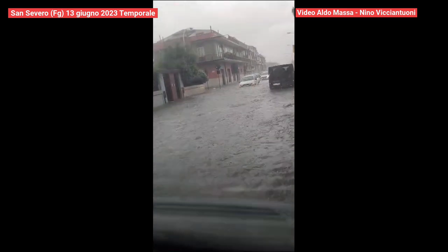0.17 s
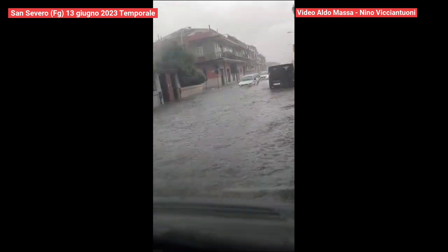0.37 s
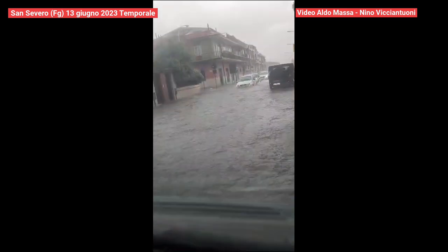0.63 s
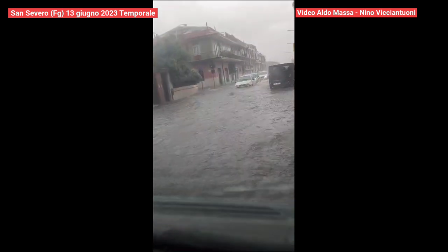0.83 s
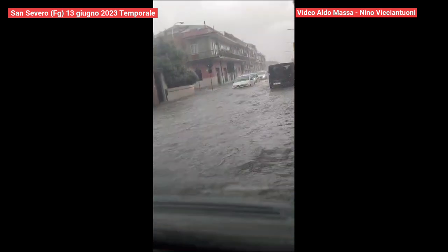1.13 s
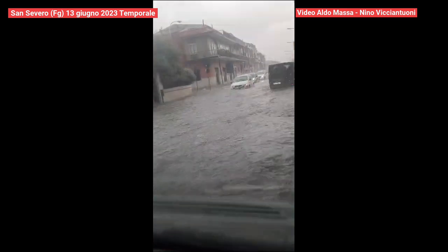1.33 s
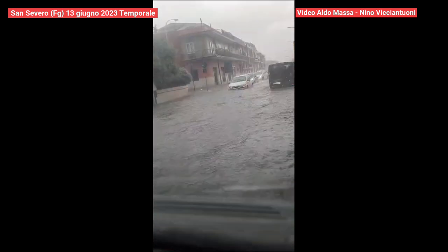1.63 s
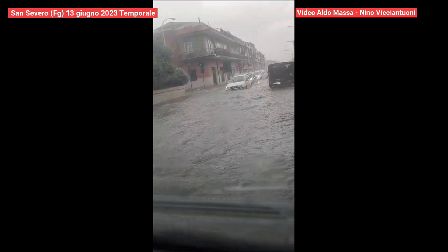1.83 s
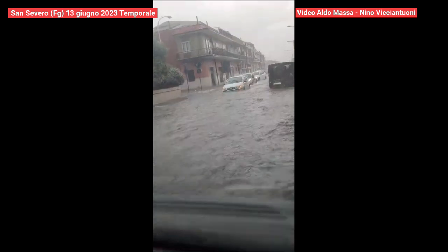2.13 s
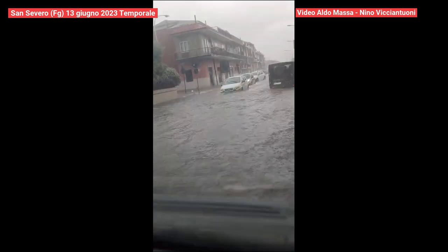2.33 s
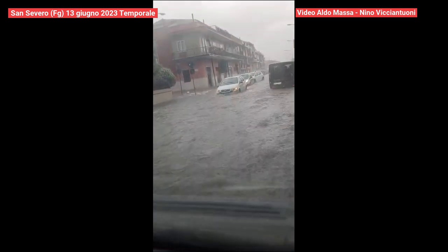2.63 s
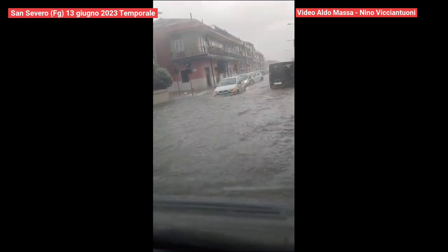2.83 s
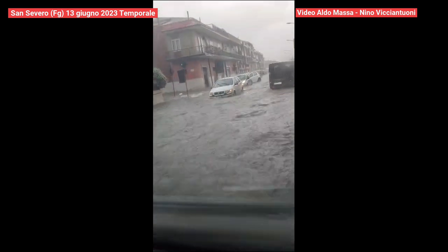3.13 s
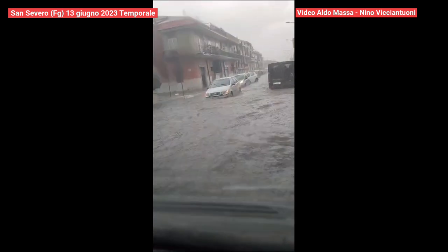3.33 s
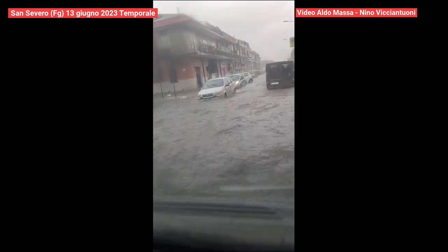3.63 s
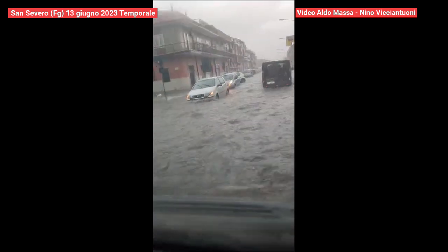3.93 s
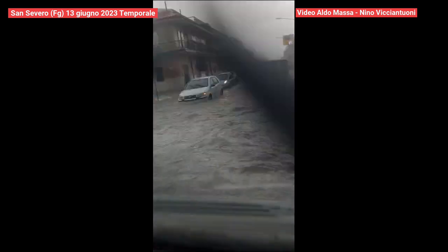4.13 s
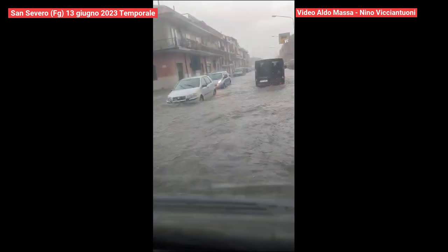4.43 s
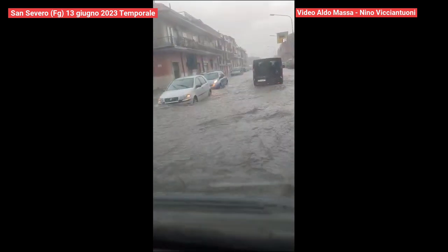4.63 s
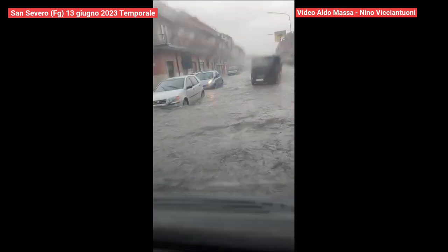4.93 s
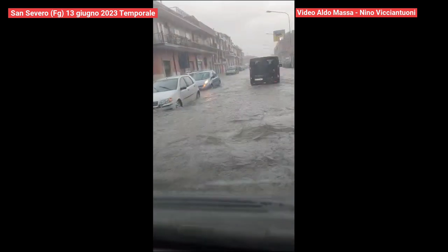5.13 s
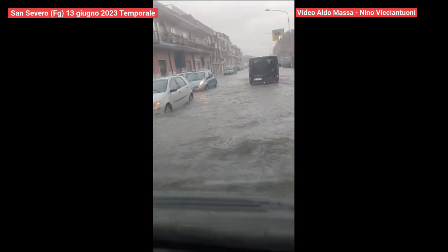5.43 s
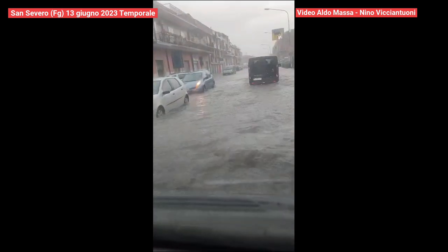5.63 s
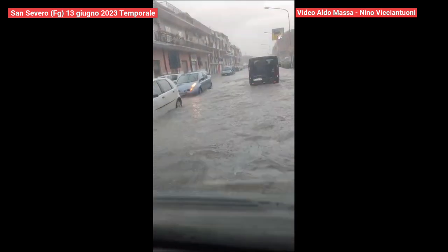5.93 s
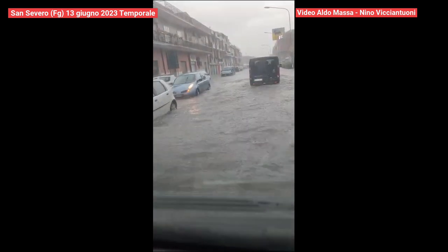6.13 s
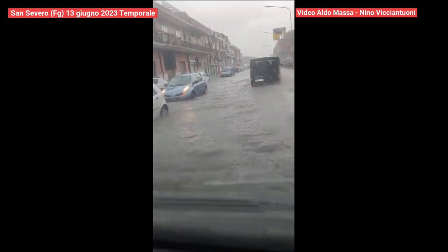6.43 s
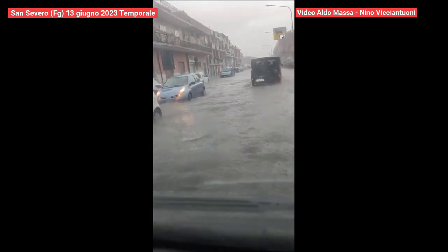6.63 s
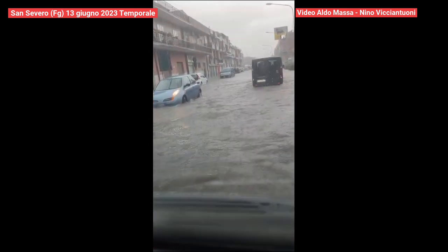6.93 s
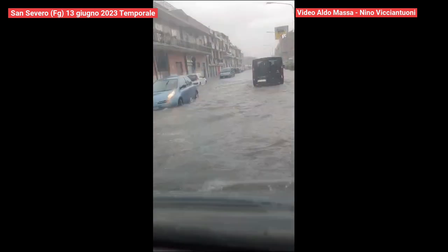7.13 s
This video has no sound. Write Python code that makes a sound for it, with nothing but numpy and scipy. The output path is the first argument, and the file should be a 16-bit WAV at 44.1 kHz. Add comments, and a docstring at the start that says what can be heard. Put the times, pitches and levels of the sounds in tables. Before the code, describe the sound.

Inside a car driving through floodwater in rain, heard by two microphones in the cabin. A loud, bass-heavy rumble of water drumming on the floor runs throughout, growing slightly, with gurgling wash and thin splattery spray. Wipers work on a strict beat, with sharp rattly plastic clicks near 0.25, 1.2, 2.2, 3.1, 4.1, 5.0, 6.0 and 6.9 s; about 0.2 s after each comes a rubbery swish and a soft low thump. Dull waves slap the floor near 0.15, 1.7 and 6.5 s. Water flow surges around 1.8 s, eases at 3, then surges again near 4.3. Very deep body heaves come between 1.9 and 3.5 s. The bow wave tumbles and sloshes around 4.45 s. Low engine boom gradually drops in pitch, becoming stronger later, over steady blower hum, vent hiss and faint rain patter. Tiny high ticks occur near 4.2 and 4.9 s. It ends mid-drive.

```python
"""Floodwater churning under a car and heavy rain on its glass, heard from inside the cabin by two microphones.
Filtered noise and random impacts make water, spray, rain and vent hiss; sines make blower hum and engine boom.
The wipers run fast on a strict beat: a sharp click of ringing plastic, then a swish and a soft thump.
The body heaves on big waves, a few waves slap the floor, and the bow wave breaks once."""
import sys
import numpy as np
from scipy import signal
from scipy.fft import rfft, irfft, next_fast_len
from scipy.io import wavfile
from scipy.ndimage import uniform_filter1d

SR = 44100
rng = np.random.default_rng(int(sys.argv[2]) if len(sys.argv) > 2 else 0)


def persist_wave(psi):
    """Save psi, clipped to +-1, as 16-bit WAV."""
    counts = np.round(np.clip(psi, -1, 1) * 32767).astype(np.int16)
    wavfile.write(sys.argv[1], SR, np.atleast_2d(counts).T)


N = 320739
T = np.arange(N) / SR
SIZE = next_fast_len(N + 8192, True)  # padded transform length
FREQ = np.maximum(np.arange(SIZE // 2 + 1) * SR / SIZE, 1)
# the moments of the wiper clicks: first one, end of the scene, period (s)
WIPES_S = np.arange(.2533, N / SR, .9557)


def undb(db):
    """Decibels to gain."""
    return 10 ** (np.asarray(db) / 20)


def unit(x):
    """Scale to rms 1."""
    return x / np.sqrt(np.mean(x ** 2))


def across(points):
    """A table of (Hz, value) joined on a log-frequency axis."""
    hz, value = np.transpose(points)
    return np.interp(np.log(FREQ), np.log(hz), value)


def spectrum(points):
    """Gain in dB of a (Hz, dB) table, falling 24 dB per octave above its last point."""
    octaves_above = np.log2(np.maximum(FREQ / points[-1][0], 1))
    return across(points) - 24 * octaves_above


def curves(rows):
    """The columns of a (s, ..) table at every sample."""
    s, *columns = np.transpose(rows)
    return [np.interp(T, s, c) for c in columns]


def noise():
    """Two unrelated white noises."""
    return rng.standard_normal((2, N))


def walk(rate):
    """Random levels held 1 / rate s and slewed twice; spread near 1."""
    k = max(int(SR / rate), 1)
    held = np.repeat(rng.standard_normal(N // k + 1), k)
    slewed = uniform_filter1d(uniform_filter1d(held, k), k)
    return 1.3 * slewed[:N]


def drops(rate, spread_db):
    """Random impacts on two sides, rate per second on each, many small and a few large; rms 1."""
    hits = rng.random((2, N)) < rate / SR
    signs = rng.choice([-1, 1], (2, N))
    sizes = undb(spread_db * np.minimum(rng.exponential(size=(2, N)), 5))
    return unit(hits * signs * sizes)


def swell(at, sigma):
    """A smooth bell-shaped rise and fall around one moment (both in s)."""
    return np.exp(-.5 * ((T - at) / sigma) ** 2)


def cabin(pair, colour_db, lag_ms=0):
    """Colour two unrelated signals and spread them over the microphones; their middle has rms 1."""
    # likeness of the two microphones, limited below to +-0.95: frequency_hz, correlation
    likeness = [(30, 1.2), (60, 0.52), (140, 0.43), (260, 0.5), (640, 0.9), (880, 0.84), (1100, -0.37),
                (1350, -0.42), (1700, 0), (2600, 0.16), (4000, 0.02), (5900, 0.1), (6500, 1), (11000, 0.9),
                (14000, 0)]
    # balance of the two microphones: frequency_hz, left_minus_right_db
    tilt = [(50, 2.5), (80, -1.5), (115, 4.5), (230, 3.5), (380, 1.5), (600, 0), (900, -2.5), (1250, 0.5),
            (2200, 0), (4400, -4.5), (6200, -11), (7400, -1.5), (8600, 10.5), (13000, -13.5)]
    common, apart = rfft(pair, SIZE)
    like = np.clip(across(likeness), -.95, .95)
    sides = np.array([[1], [-1]])
    gain = undb(sides * across(tilt) / 2)
    both = np.sqrt(1 + like) * common + sides * np.sqrt(1 - like) * apart
    if lag_ms:
        # an unrelated share of the same sound comes from the left and reaches the right microphone late
        direct = rfft(np.roll(pair[0], N // 2), SIZE)
        both = both + .7 * direct * np.exp(1j * np.pi * sides * FREQ * lag_ms / 1000)
    middle_gain = np.sqrt((gain ** 2).sum(0) + 2 * like)
    out = irfft(gain * both * undb(colour_db) / middle_gain, SIZE)[:, :N]
    return out / out.mean(0).std()


def engine():
    """The firing rate sinks overall under the drag of the water; it and its octave boom in the cabin."""
    # firing rate and level of its tone: time_s, firing_hz, level_db
    firing = [(0, 58, -35), (2, 56.67, -35), (2.8, 54.06, -23), (3.7, 55.5, -31.5), (4.15, 54.34, -22),
              (5.4, 53.36, -26.5), (5.8, 51.72, -22.5), (6.4, 52.14, -20.5), (7.27, 51.5, -23.5)]
    hz, db = curves(firing)
    phase = 2 * np.pi * np.cumsum(hz * (1 + .005 * walk(10))) / SR
    level = np.sqrt(2) * undb(db + 0.23 * walk(6.9))
    boom = np.sin(phase) + undb(-7.0) * np.sin(2 * phase)
    return level * boom * undb([[.6], [-.6]])


def blower():
    """The slightly unbalanced wheel hums at multiples of its shaft rate while air hisses through the vents."""
    # hum of the wheel, each level wandering: shaft_multiple, level_db
    wheel = [(1, -33.5), (2, -30.5), (3, -27.5), (4, -38), (5, -39.5), (6, -40), (7, -46), (9, -49),
             (10, -49)]
    # colour of the air hiss: frequency_hz, relative_db_per_hz
    vent = [(700, -4), (1200, -2.5), (1500, -6), (1900, -9.5), (2600, -4), (3600, -6.5), (4600, -5),
            (5000, -8.5), (6500, 0), (7400, -6.5), (8100, -8), (8700, -19), (10000, -27), (15800, -27.5)]
    # narrow resonances of the air vents: frequency_hz, width_hz, lift_db
    grille = [(2700, 63, 3), (3270, 140, 1.5), (3875, 87, 6.5), (4750, 49, 8), (6420, 120, -5),
              (7290, 70, 9.5)]
    shaft_hz = 59.2
    turns = np.cumsum(shaft_hz * (1 + .002 * walk(3))) / SR
    hum = 0
    for multiple, db in wheel:
        tone = np.sin(2 * np.pi * (round(multiple) * turns + rng.random()))
        hum = hum + undb(db + walk(4.6)) * np.sqrt(2) * tone
    lift_db = sum(db / (1 + (2 * (FREQ - hz) / width) ** 2) for hz, width, db in grille)
    hiss = cabin(noise() * undb(0.33 * walk(15)), spectrum(vent) + lift_db)
    return hum * undb([[.8], [-.8]]) + hiss * undb(-42.5)


def rain():
    """Drops patter on the windscreen and roof; fine droplets arrive in flurries."""
    # colour of the patter: frequency_hz, relative_db_per_hz
    patter_colour = [(400, 5), (900, -2), (2500, -11), (5000, -12), (7500, -9), (9500, -30), (15000, -23)]
    # colour of fine droplets that burst on the glass: frequency_hz, relative_db_per_hz
    droplet_colour = [(3000, -9), (7000, 2), (10000, 0), (15500, -5)]
    patter = cabin(drops(rate=100, spread_db=3), spectrum(patter_colour)) * undb(-52.5)
    droplets = drops(rate=1500, spread_db=1.5) * undb(5 * walk(15))
    flurries = cabin(droplets, spectrum(droplet_colour)) * undb(-69)
    return patter + flurries


def thin_ticks():
    """Two thin, faint high ticks: very short bursts of treble noise."""
    # the two ticks: centre_s, peak_level_db
    ticks = [(4.187, -50), (4.947, -47)]
    bursts = sum(undb(db) * swell(s, sigma=0.00044) for s, db in ticks)
    return cabin(noise(), spectrum([(5000, -12), (10000, 0), (15500, -1)])) * bursts


def heaving_body():
    """The body sways all the time and heaves when a big wave passes under it: very low noise."""
    # big waves: centre_s, level_db
    waves = [(1.9, -23), (2.45, -20), (2.93, -19), (3.48, -18)]
    sway_db, wave_sigma_s = -28, .09
    wave_power = sum((undb(db) * swell(s, wave_sigma_s)) ** 2 for s, db in waves)
    size = np.sqrt(undb(sway_db) ** 2 + wave_power)
    heave = cabin(noise(), spectrum([(6, -30), (15, -20), (22, 12), (35, -3), (46, -4)]))
    # even out the swing, then let it follow the size of the waves
    swing = np.sqrt(uniform_filter1d(heave.mean(0) ** 2, SR // 12))
    return heave / swing * size


def floodwater():
    """Water drums on the floor, the bow wave gurgles, and the tyres fling spray into the arches."""
    # water flow against the tyres and floor: time_s, db_about_usual
    flow = [(0.0, 0.8), (0.65, 1.7), (1.35, -0.2), (1.8, 2.6), (2.6, -2), (3.0, -3), (3.85, 0.4),
            (4.28, 2.5), (4.7, 1.0), (5.15, 0.9), (5.7, -0.3), (6.3, 1), (6.8, -1.5), (7.27, -2.5)]
    # colour of the drumming on the floor: frequency_hz, relative_db_per_hz
    rumble_colour = [(15, -16), (30, -7), (50, 0.5), (78, -0.5), (112, -0.5), (150, -1.8), (200, -5),
                     (290, -6.5), (360, -10.5), (450, -19.5), (700, -30), (1200, -54)]
    # colour of the bow wave: frequency_hz, relative_db_per_hz
    wash_colour = [(250, -15.5), (450, -0.5), (620, 3), (740, -1.5), (820, -3), (900, -3.5), (1060, -7),
                   (1200, -14), (1500, -13.5), (1900, -21.5), (3500, -59)]
    # colour of the tyre spray: frequency_hz, relative_db_per_hz
    spray_colour = [(650, -8.5), (950, 4.5), (1200, -2.5), (1800, -4), (2350, 1), (2750, -2), (3200, -4.5),
                    (3700, -8.5), (5000, -12), (7500, -9.5), (9500, -27.5), (15000, -32.5)]
    flow_db, = curves(flow)
    rumble = cabin(noise() * undb(0.42 * walk(16)), spectrum(rumble_colour))
    # the drumming grows, in dB per second, as the water deepens
    rumble = rumble * undb(-21.5 + 0.0854 * T)
    gurgle = (noise() + 0.72 * drops(rate=700, spread_db=2.0)) * undb(0.33 * walk(16))
    wash = cabin(gurgle, spectrum(wash_colour))
    splatter = (noise() + 0.95 * drops(rate=2500, spread_db=4.5)) * undb(1.15 * walk(28))
    spray = cabin(splatter, spectrum(spray_colour), lag_ms=0.29)
    # per dB of flow, spray gains more than a dB and the bow wave less
    return rumble + wash * undb(-33 + 0.43 * flow_db) + spray * undb(-43 + 1.8 * flow_db)


def breaking_wave():
    """The bow wave tumbles over once and sloshes along the front of the car: noise and dense impacts."""
    splashes = noise() + drops(rate=540, spread_db=0.5)
    slosh = cabin(splashes, spectrum([(450, -16), (780, 2), (1000, -1.5), (1250, -12), (2000, -19)]))
    return slosh * swell(4.45, sigma=0.35) * undb(-38)


def thumps():
    """Turning blades and slapping waves make windscreen and floor panels shudder for a few cycles."""
    # waves that slap the floor panels: centre_s, level_db, mean_pitch_hz
    slaps = [(.15, -20, 126.4), (1.72, -21, 163.7), (6.513, -23, 147.8)]
    turn_delay_s = 0.192  # from the click to the thump of the turning blades
    wobble = np.cumsum(0.081 * walk(70)) / SR  # unsteady pitch, as a time shift in s

    def shudder(s, db, hz, sigma):
        """One soft push on a panel."""
        return undb(db) * swell(s, sigma) * np.sin(2 * np.pi * (hz * (T + wobble) + rng.random()))

    windscreen = sum(shudder(s + turn_delay_s, db=-16, hz=117.8, sigma=0.029) for s in WIPES_S)
    floor = sum(shudder(s, db, hz, sigma=0.041) for s, db, hz in slaps)
    return np.sqrt(2) * (windscreen + floor) * undb([[.3], [-.3]])


def wiper_swish():
    """After each click the arms load their linkage, then wet rubber slides and flicks water off the glass."""
    load = sum(swell(s + 0.118, sigma=0.015) for s in WIPES_S)
    slide = sum(swell(s + 0.2, sigma=0.043) for s in WIPES_S)
    groan = cabin(noise(), spectrum([(100, -16), (200, -8.5), (265, 6.5), (330, -9)]))
    rubber_colour = [(80, -4), (170, 5.0), (330, -1.5), (480, -15.0), (850, -16), (1200, -38)]
    rubber = cabin(noise(), spectrum(rubber_colour))
    flung_water = noise() + drops(rate=1000, spread_db=4.5)
    flick = cabin(flung_water, spectrum([(1400, -16), (2000, 0), (2300, 3), (2700, -1), (3500, -16)]))
    return groan * load * undb(-26.5) + rubber * slide * undb(-24.5) + flick * slide * undb(-45)


def wiper_clicks():
    """The wiper drive snaps over: a short rattle rings the plastic around it and knocks the dashboard."""
    # what the click rings with: frequency_hz, relative_db, t60_s
    click_modes = [(1984, -8, 0.049), (2144, -2, 0.044), (2310, -4, .045), (2460, -16, .04),
                   (2647, 4.5, 0.047), (2860, 0, 0.064), (3233, 3, 0.057), (3550, -9.5, 0.067)]
    t = T[:SR // 8]
    ring, rattle = np.zeros((2, N)), np.zeros(N)
    knock = undb(-60 * t / 0.1 - 15) * np.sin(2 * np.pi * 112 * t)
    rise = 1 - np.exp(-t / .0016)
    phases = rng.random(len(click_modes))
    for s in WIPES_S:
        strength = undb(-1.2 + 0.5 * rng.standard_normal())
        plastic = 0
        for (hz, db, t60), phase in zip(click_modes, phases):
            # each mode reaches the two microphones in its own phase
            cycles = hz * t + phase + .1 * rng.standard_normal((2, 1))
            plastic = plastic + undb(db - 60 * t / t60) * np.sin(2 * np.pi * cycles)
        start = int(s * SR)
        stop = start + len(t)
        ring[:, start:stop] += strength * (plastic * rise * undb([[-31.5], [-28.5]]) + knock)
        rattle[start:stop] += strength * np.sqrt(rise) * np.exp(-t / 0.015)
    crack_colour = [(1000, -29), (1900, -3), (2300, 3), (3300, 0.5), (3600, -9), (7200, -9.5), (8300, -24)]
    crack = cabin(noise(), spectrum(crack_colour))
    return ring + undb(-29) * crack * rattle


def scene():
    """Everything as it meets inside the cabin."""
    background = engine() + blower() + rain() + thin_ticks()
    water = heaving_body() + floodwater() + breaking_wave()
    return background + water + thumps() + wiper_swish() + wiper_clicks()


def record(dry):
    """The microphones lose the deepest rumble, below 14 Hz, and the top, above 15.8 kHz."""
    low_cut = signal.butter(2, 14, "highpass", fs=SR, output="sos")
    top_cut = signal.ellip(10, .2, 80, 15800, fs=SR, output="sos")
    return signal.sosfilt(top_cut, signal.sosfilt(low_cut, dry))


dry = scene()
out = record(dry)
persist_wave(out)
```